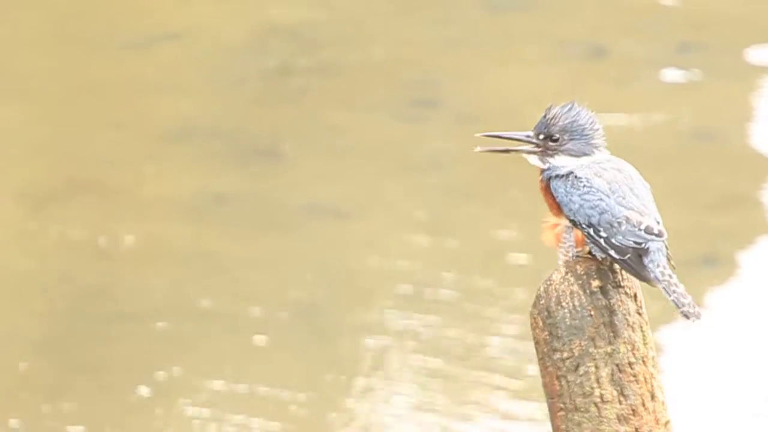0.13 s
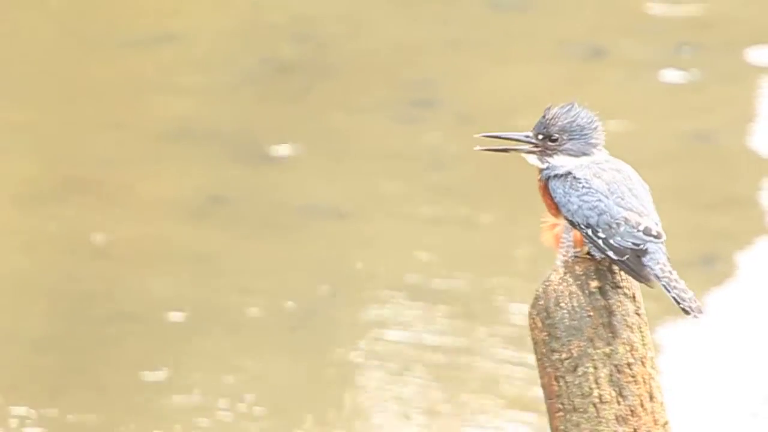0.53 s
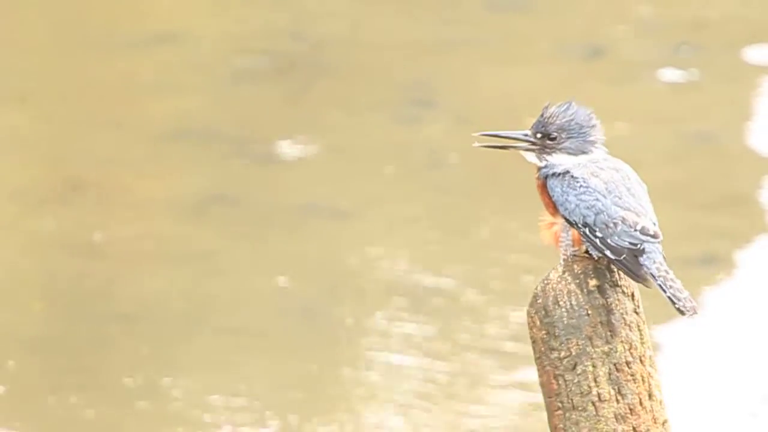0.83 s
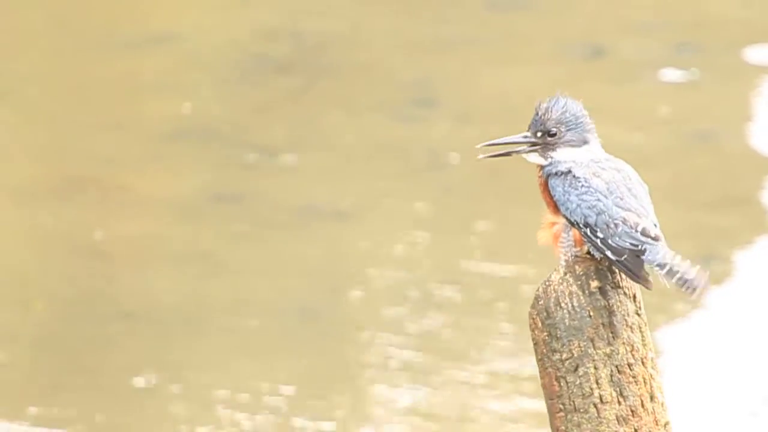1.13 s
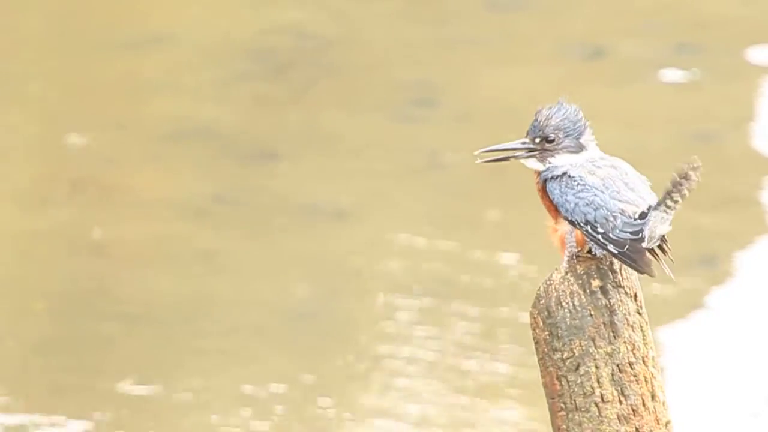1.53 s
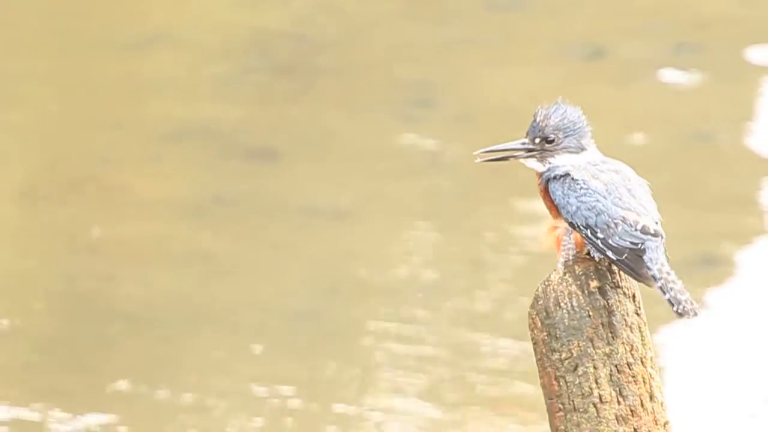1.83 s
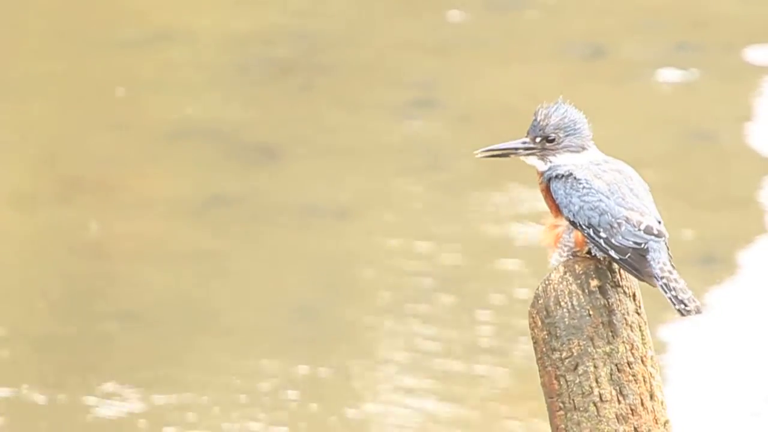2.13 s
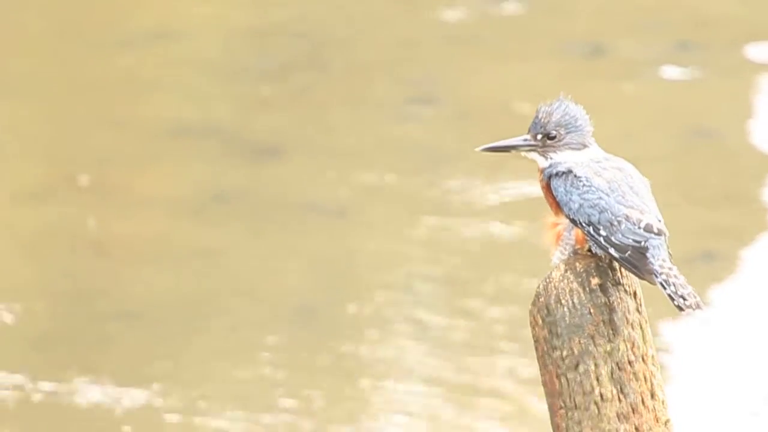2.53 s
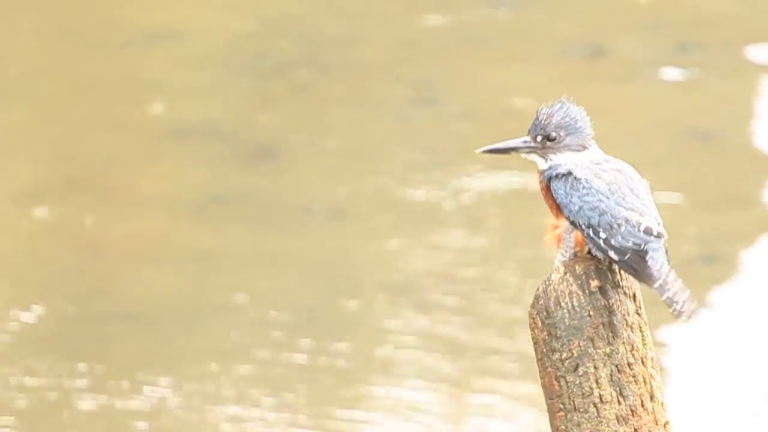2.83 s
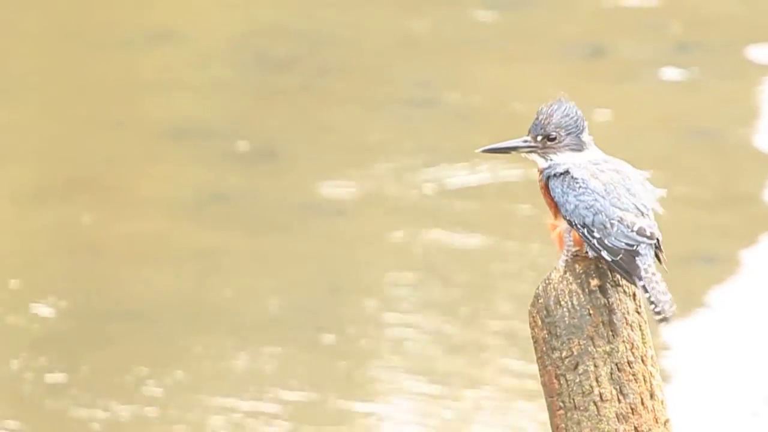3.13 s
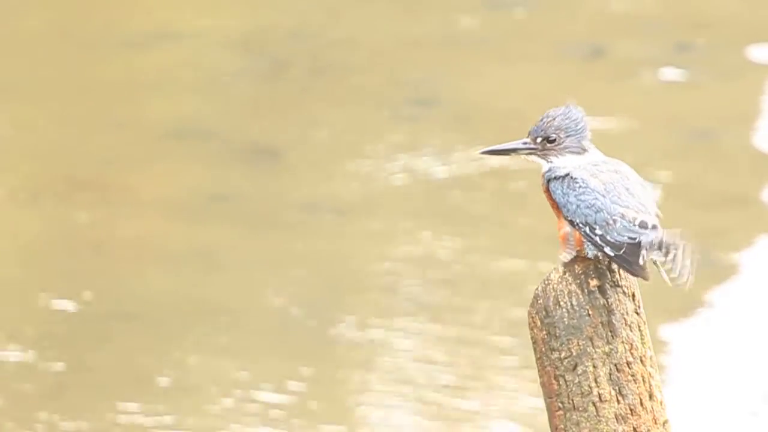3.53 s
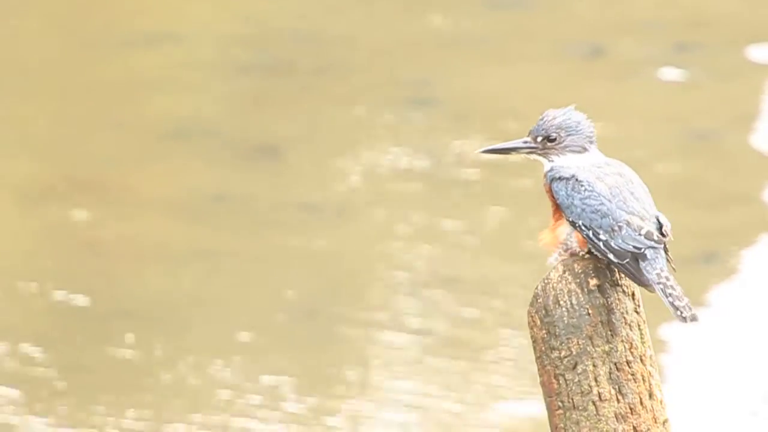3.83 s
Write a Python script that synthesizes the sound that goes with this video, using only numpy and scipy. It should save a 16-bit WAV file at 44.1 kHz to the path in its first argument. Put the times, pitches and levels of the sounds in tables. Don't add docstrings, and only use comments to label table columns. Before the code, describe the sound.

A kingfisher rattles from the start to about 2.05 s: twenty-two short, buzzy notes, roughly eleven a second, each dropping in pitch, with brief scatter off water and bank. Wind thumps and crackles strongly near 0.1 and 0.4 s, again around 2.3-2.5 s. Faint songbird whistles come at 1-2.2 s. River wash continues; cloth rubs from 3.3 s, with a loud case knock and click near 3.8 s.

```python
import sys
import numpy as np
from scipy import signal
from scipy.fft import rfft, irfft, next_fast_len
from scipy.io import wavfile
from scipy.ndimage import uniform_filter1d, map_coordinates

SR = 44100
rng = np.random.default_rng(int(sys.argv[2]) if len(sys.argv) > 2 else 0)


def decibels_to_gain(level_db):
    exponent = np.asarray(level_db, float) / 20
    return 10 ** exponent


def store_pcm(level_fs):
    pcm = np.round(np.clip(level_fs, -1, 1) * 32767).astype(np.int16)
    wavfile.write(sys.argv[1], SR, np.atleast_2d(pcm).T)


N = 176400

# time_s, level_db
RIVER_LEVEL = [(0, -57), (.5, -53.5), (1.9, -47.5), (2.7, -49.5), (4, -47.5)]
# freq_hz, density_db
RIVER_TONE = [(150, -56), (250, -11), (629, -11), (2360, -17), (2570, -15.5), (11700, -32.5), (14900, -34),
              (16000, -46)]
# start_s, length_s, from_hz, to_hz, bend_hz, level_db
WHISTLES = [(1.02, .09, 5230, 5220, 0, -70), (1.21, .13, 5230, 5220, 0, -66),
            (1.34, .16, 5220, 5220, 0, -70), (1.86, .07, 2200, 2200, 0, -60),
            (1.945, .014, 2500, 2480, 0, -44), (1.957, .018, 2850, 3100, 0, -53),
            (1.96, .066, 1850, 1800, 850, -54), (2.044, .04, 2650, 2400, 60, -55),
            (2.105, .016, 4000, 4400, 0, -63), (2.137, .036, 4350, 5550, 150, -60),
            (2.195, .09, 4020, 3980, 0, -65)]
# time_s, strength_db
WIND_STRENGTH = [(0, -20.5), (.12, -13.5), (.3, -35), (.58, -30.5), (.92, -31.5), (1.27, -37.5),
                 (1.36, -24.5), (1.75, -30), (1.8, -43), (1.95, -28.5), (2.07, -37.5), (2.22, -29),
                 (2.3, -22), (2.6, -24.5), (2.7, -31.5), (3.33, -31.5), (3.4, -42), (4, -21)]
# freq_hz, density_db
RUMBLE_TONE = [(12, -55), (20, 4), (70, 5), (130, 1), (375, -17.5), (600, -28), (910, -35.5), (1540, -120)]
# time_s, strength_db, pitch_hz
EDDIES = [(0.086, -17, 173.8), (0.121, -2, 239.8), (0.14, -12, 313.6), (0.154, -14.5, 184),
          (0.183, -30, 105), (0.199, -25, 224), (0.237, -24.5, 125.3), (0.282, -18, 176.4),
          (0.343, -20.5, 115.6), (0.388, -15.5, 196.4), (0.411, -9, 226.2), (0.429, -14.5, 242.1),
          (0.456, -8, 151.6), (0.471, -19.5, 190.5), (0.517, -26, 117.7), (0.55, -18.5, 203.5),
          (0.638, -16.5, 200.7), (0.664, -20.7, 144.8), (0.806, -17.5, 170.6), (0.857, -14, 206.8),
          (1.167, -19.5, 204.6), (1.186, -22, 122.4), (1.351, -17.5, 136.1), (1.367, -33, 143.6),
          (1.393, -22.5, 194), (1.435, -13, 152.4), (1.464, -24, 119), (1.486, -21, 174.6),
          (1.521, -21.5, 121), (1.578, -28.5, 134.5), (1.626, -25, 145), (1.762, -24, 111.7),
          (1.848, -21.5, 140.2), (1.895, -14.5, 142.4), (1.916, -24, 162), (1.974, -22, 131),
          (2.262, -20.5, 129.3), (2.29, -15, 148.3), (2.305, -18, 145.8), (2.331, -19.7, 190),
          (2.353, -18, 160.7), (2.377, -14.5, 151.4), (2.397, -10, 212.5), (2.414, -15.5, 165.5),
          (2.441, -21.5, 108.5), (2.473, -18.5, 145.6), (2.534, -23, 112.2), (2.58, -18, 137.4),
          (2.754, -11, 122.9), (2.77, -22.5, 194), (2.806, -14.5, 182.7), (2.991, -14.5, 153),
          (3.015, -22.1, 113), (3.037, -17.5, 112), (3.065, -20, 184), (3.654, -16.1, 195.8),
          (3.711, -19, 121.8), (3.735, -28, 115.6), (3.809, -26, 187.7), (3.985, -25, 240)]
# freq_hz, density_db
WAKE_TONE = [(30, -25), (90, 2.5), (190, 0.5), (380, -13.5), (800, -39.5), (1500, -120)]
# time_s, strength_db, width_s
CRACKLES = [(0.071, -30.5, 0.022), (0.095, -36, 0.017), (0.122, -14.5, 0.008), (0.139, -19.5, 0.0028),
            (0.163, -34, 0.0041), (0.412, -34, 0.0041), (0.429, -24.5, 0.0033), (0.45, -28, 0.012),
            (0.469, -28.5, 0.0015), (0.554, -36, 0.0038), (0.804, -35.5, 0.0053), (0.858, -21, 0.0015),
            (1.39, -28.5, 0.0023), (1.514, -37.6, 0.0045), (1.887, -26, 0.004), (2.294, -50, 0.0054),
            (2.318, -39.3, 0.0049), (2.329, -34.5, 0.0037), (2.377, -41, 0.0025), (2.39, -26.5, 0.0033),
            (2.412, -35, 0.0054), (2.47, -54, 0.0043), (2.804, -40.5, 0.006), (2.989, -30, 0.0042)]
# freq_hz, density_db
CRACKLE_TONE = [(200, -18), (400, 17), (800, 2.5), (1500, -28.5), (4000, -64)]
# freq_hz, density_db
SPIT_TONE = [(700, -31), (1300, 7.5), (2200, -12), (3500, -24), (6000, -71)]
# time_s, level_db, hollow_hz
SLEEVE = [(3.3, -52, 1500), (3.342, -55.5, 1790), (3.368, -47, 2310), (3.41, -43, 2860), (3.475, -46, 3770),
          (3.515, -54, 3250), (3.55, -50, 1400), (3.59, -49, 1850), (3.628, -53, 4030), (3.67, -51.5, 4300),
          (3.71, -49, 5200), (3.75, -50.5, 2840), (3.88, -51, 2260), (3.92, -57, 2600), (4, -55, 2500)]
# freq_hz, density_db
CLOTH_TONE = [(180, -37), (300, -5.5), (433, -6), (5340, -12), (14200, -19), (16000, -21)]
# start_s, peak_db, lowest_hz, t60_s
TICKS = [
    (1.4855, -38, 3000, .008),
    (1.8232, -27.5, 5000, .004),
    (1.852, -39, 8000, .004),
    (2.287, -37, 2500, .006),
    (2.864, -45, 8000, .05),
    (3.8035, -17, 500, .007),
]
# start_s, peak_db, pitch_hz, t60_s
KNOCKS = [
    (3.7828, -22, 800, .022),
    (3.8055, -23, 650, .018),
    (3.543, -28, 900, .015),
]
# freq_hz, width_hz, level_db
CASE = [(2530, 170, 16), (3500, 870, 12.5), (4800, 830, 11), (6300, 190, 14), (8950, 310, 7),
        (11700, 830, 0), (13500, 4000, -12)]
# drop_start_s, level_db, top_pitch_hz, lead_in_s
NOTES = [(0.0605, -35, 1390, 0.0022), (0.163, -35, 1432, 0.006), (0.256, -31.5, 1436, 0.0011),
         (0.347, -29, 1430, 0.0066), (0.4387, -28, 1450, 0.005), (0.527, -28.5, 1450, 0.0044),
         (0.614, -28.5, 1430, 0.0081), (0.7073, -27.5, 1420, 0.013), (0.7968, -28.5, 1420, 0.0068),
         (0.9002, -32.5, 1398, 0.0081), (0.9948, -34.5, 1376, 0.0078), (1.0774, -29.5, 1448, 0.0013),
         (1.1661, -29.5, 1350, 0.01), (1.261, -31.5, 1387, 0.0023), (1.3538, -32, 1383, 0.0077),
         (1.4497, -31.5, 1323, 0.00067), (1.5394, -26, 1400, 0.0042), (1.641, -28.5, 1370, 0.0019),
         (1.732, -28.5, 1365, 0.004), (1.837, -30.5, 1370, 0.013), (1.93, -29.5, 1357, 0.0032),
         (2.026, -28, 1390, 0.0039)]
# freq_hz, width_hz, level_db
THROAT = [(1706, 440, 3), (2225, 280, 6.5), (3124, 560, 4.5), (4586, 810, 1.5), (6240, 1170, -1.5),
          (8140, 2600, -5.5), (11100, 4100, -14.5)]
# freq_hz, t60_s
BANK_DECAY = [(1500, 0.11), (4000, 0.12), (10000, 0.052)]


def unit(x):
    return x / np.sqrt(np.mean(x ** 2) + 1e-20)


def along(points, hz):
    f, v = np.transpose(points)
    return np.interp(np.log(hz + 1), np.log(f + 1), v)


def curves(rows):
    s, *cols = np.transpose(rows)
    return [np.interp(np.arange(N) / SR, s, c) for c in cols]


def wobble(rate):
    return map_coordinates(rng.standard_normal(1000), [np.arange(N) * rate / SR])


def filtered(x, response):
    m = next_fast_len(len(x) + 4096)
    return irfft(rfft(x, m) * response(np.fft.rfftfreq(m, 1 / SR)), m)[:len(x)]


def resonant(peaks, above_hz):
    def response(f):
        low_cut = (1j * f / (above_hz + 1j * f)) ** 4
        ringing = sum((-1) ** k * decibels_to_gain(db) * 1j * f * width / (centre ** 2 - f * f + 1j * f * width)
                      for k, (centre, width, db) in enumerate(peaks))
        return low_cut * ringing
    return response


def noise(spectrum):
    return unit(filtered(rng.standard_normal(N), lambda hz: decibels_to_gain(along(spectrum, hz))))


def turbulence(spectrum, even, span):
    x = noise(spectrum)
    power = uniform_filter1d(uniform_filter1d(x * x, size=span), size=span)
    return unit(x / np.abs(power + 0.013) ** (even / 2))


def add(track, s, sound):
    part = track[round(s * SR):][:len(sound)]
    part += sound[:len(part)]


def river():
    level_db, = curves(RIVER_LEVEL)
    return decibels_to_gain(level_db + 1.05 * wobble(12)) * noise(RIVER_TONE)


def songbirds():
    out = np.zeros(N)
    for s, length, from_hz, to_hz, bend_hz, db in WHISTLES:
        u = np.linspace(0, 1, int(length * SR))
        arch = np.sin(np.pi * u)
        flutter_hz = 12 * uniform_filter1d(rng.standard_normal(len(u)), size=60) * np.sqrt(60)
        pitch = from_hz + (to_hz - from_hz) * u + bend_hz * arch ** 2 + flutter_hz
        add(out, s, decibels_to_gain(db + 8) * arch ** .5 * np.sin(2 * np.pi * np.cumsum(pitch) / SR))
    return out * decibels_to_gain(3 * wobble(90))


def wind():
    lull_db, lump_db, eddy_db, wake_db, crackle_db, spit_db = -5.5, 4.5, 2, -10.5, 1.5, 6
    rise_cycles, fade_cycles, wake_cycles = 0.36, 0.71, 2.66
    sag = 0.2024
    port_hz = 39
    strength_db, = curves(WIND_STRENGTH)
    push, wake, edge = np.zeros((3, N))
    t = np.arange(-2048, 4096) / SR
    for (s, db, hz), start in zip(EDDIES, rng.uniform(0, 2 * np.pi, len(EDDIES))):
        cycles = t * hz
        swell = np.exp(-(cycles / np.where(t < 0, rise_cycles, fade_cycles)) ** 2)
        pitch = hz * np.exp(-sag * np.clip(cycles, -2, 4))
        add(push, s + t[0], decibels_to_gain(db + eddy_db) * swell * np.cos(start + 2 * np.pi * np.cumsum(pitch) / SR))
        trail = np.exp(-(cycles / np.where(t < 0, 1, wake_cycles)) ** 2)
        add(wake, s + t[0], decibels_to_gain(db + wake_db) * trail)
    for s, db, width in CRACKLES:
        burst = np.exp(-(t / (width * np.where(t < 0, 0.39, 1))) ** 2)
        add(edge, s + t[0], decibels_to_gain(db + crackle_db) * burst)
    rumble_level = decibels_to_gain(strength_db + lull_db + lump_db * wobble(22.334))
    air = rumble_level * turbulence(RUMBLE_TONE, even=0.1, span=900)
    air = air + push + edge * turbulence(CRACKLE_TONE, even=0.48, span=80)
    air = air + wake * turbulence(WAKE_TONE, even=0.38, span=500)
    air = air + decibels_to_gain(spit_db + 6 * wobble(170)) * np.roll(edge, 70) ** 2 * noise(SPIT_TONE)
    air = air * np.clip(np.arange(N) / 300, 0, 1)
    return filtered(air, lambda f: (1j * f / (port_hz + 1j * f)) ** 2)


def sleeve():
    hollow_db, hollow_octaves = 1.5, .45
    level_db, hollow_hz = curves(SLEEVE)
    hz, t, z = signal.stft(rng.standard_normal(N), SR, nperseg=256)
    centre = hollow_hz[np.minimum((t * SR).astype(int), N - 1)]
    octaves = np.log2((hz[:, None] + 1) / centre)
    fold = signal.istft(z * np.exp(-(octaves / hollow_octaves) ** 2), SR, nperseg=256)[1][:N]
    touching = np.clip((np.arange(N) / SR - SLEEVE[0][0]) * 20, 0, 1)
    rub = decibels_to_gain(10.0) * noise(CLOTH_TONE) + decibels_to_gain(hollow_db) * unit(fold)
    return touching * decibels_to_gain(level_db + 0.5 * wobble(60)) * rub


def ticks():
    out, t = np.zeros(N), np.arange(2048) / SR
    for s, db, low_hz, t60 in TICKS:
        ring = filtered(rng.standard_normal(len(t)) * decibels_to_gain(-60 * t / t60), resonant(CASE, low_hz))
        add(out, s, decibels_to_gain(db) * ring / np.abs(ring).max())
    for s, db, hz, t60 in KNOCKS:
        grit = uniform_filter1d(rng.standard_normal(len(t)), size=9)
        add(out, s, decibels_to_gain(db - 60 * t / t60) * (np.sin(2 * np.pi * hz * t) + grit))
    return out


def note_pitch(t, top_hz):
    bottom, drop_s = 0.34, 0.0089
    arch, arch_s = 0.25, .0075
    pitch = top_hz * (bottom + (1 - bottom) * np.exp(-(np.maximum(t, 0) / drop_s) ** 2))
    return pitch * (1 - arch * np.clip(-t / arch_s - .4, 0, 1) ** 2)


def voice_pulses(t, s, top_hz, shake, hiss):
    jitter, breath_db, strongest_top_hz = .045, -5, 10900
    dull_db = 7 if s < 0.87 else 10
    favoured = 3 if s < 1.4 else 2
    pitch = note_pitch(t, top_hz)
    unsteady = 1 + jitter * unit(uniform_filter1d(shake, size=40)) * (top_hz / pitch - 1)
    phase = 2 * np.pi * np.cumsum(pitch * unsteady) / SR
    k = np.arange(1, 31)[:, None]
    harmonics = np.cos(k * phase) * decibels_to_gain(0.56 * hiss[:len(k), None])
    harmonics = harmonics * (k * pitch < SR / 3) / (1 + (k * pitch / strongest_top_hz) ** 6)
    lead_in = np.clip(.4 - t / 0.0031, 0, 1)
    harmonics = harmonics * decibels_to_gain(-dull_db * np.maximum(k - favoured, 0) * lead_in)
    pulses = harmonics.sum(0) * np.sqrt(pitch / top_hz)
    return pulses + decibels_to_gain(breath_db) * hiss * (1 + np.cos(phase))


def throat_catch(t, pulses, shake, hiss):
    catch_s, width_s, catch_db, dull_hz = .0098, .0035, 3, 4500
    rough_db = 1.13 * unit(uniform_filter1d(shake, size=30))
    catch = decibels_to_gain(catch_db + rough_db) * np.exp(-((t - catch_s) / width_s) ** 2)
    return filtered(catch * (0.48 * pulses + 1.88 * hiss), lambda f: 1 / (1 + 1j * f / dull_hz) ** 2)


def water_and_bank():
    hz, t, z = signal.stft(rng.standard_normal(4096), SR, nperseg=128)
    tail = signal.istft(z * decibels_to_gain(-60 * t / along(BANK_DECAY, hz)[:, None]), SR, nperseg=128)[1]
    space = decibels_to_gain(-11.5) * tail / np.linalg.norm(tail)
    space[0] += 1
    return space


def kingfisher():
    swell_s, swell_db, attack_s, hold_s, release_s = 0.0081, 8.5, 0.0019, 0.0047, 0.0019
    out, t = np.zeros(N), np.arange(-512, 1536) / SR
    for s, db, top_hz, lead in NOTES:
        shake, hiss = rng.standard_normal((2, len(t)))
        pulses = voice_pulses(t, s, top_hz, shake, hiss)
        opening = np.clip((t + lead) / attack_s + 1, 0, 1)
        opening = opening * decibels_to_gain(swell_db * np.clip(t / swell_s - .3, -2, 0))
        closing = np.exp(-np.maximum(t - hold_s, 0) / release_s)
        source = pulses * opening * closing + throat_catch(t, pulses, shake, hiss)
        beak_hz = 1400 if s < 0.87 else 950
        voice = filtered(source, resonant(THROAT, beak_hz))
        add(out, s + t[0], decibels_to_gain(db - 4) * signal.fftconvolve(voice, water_and_bank()))
    return out


def scene():
    return (river() + songbirds() + wind() + sleeve() + ticks() + kingfisher())[None]


def top_cut(x):
    return signal.sosfilt(signal.butter(12, 16470, fs=SR, output="sos"), x)


def record(dry):
    ceiling, band_hz = .8, 15830
    rounded = ceiling * np.tanh(dry[0] / ceiling)
    kept = filtered(rounded, lambda hz: hz < band_hz)
    return top_cut(kept[None])


dry = scene()
out = record(dry)
store_pcm(out)
```